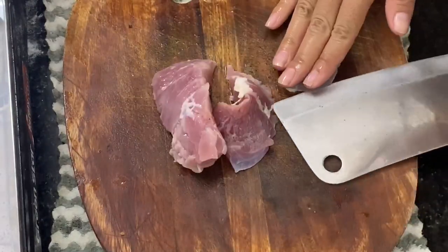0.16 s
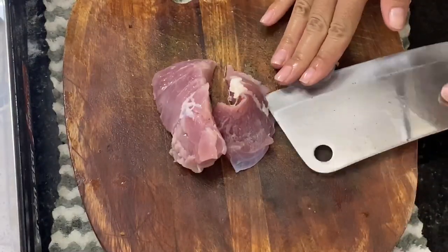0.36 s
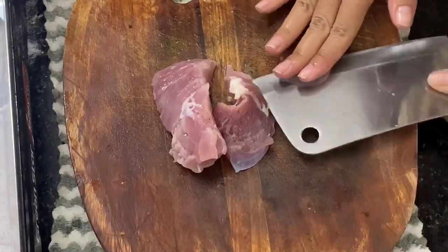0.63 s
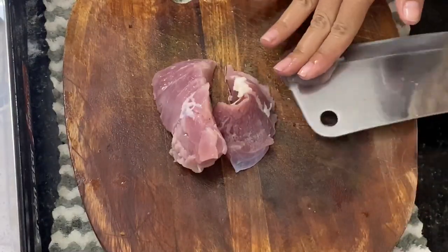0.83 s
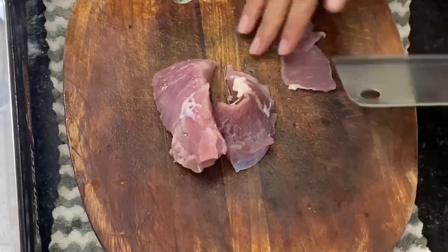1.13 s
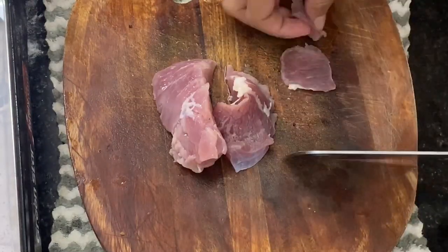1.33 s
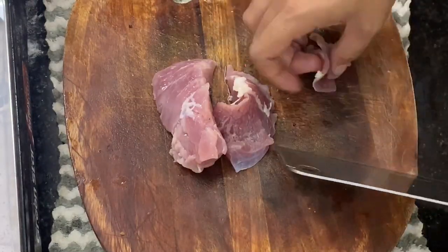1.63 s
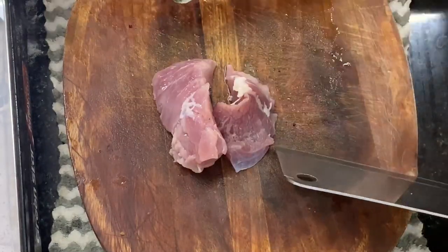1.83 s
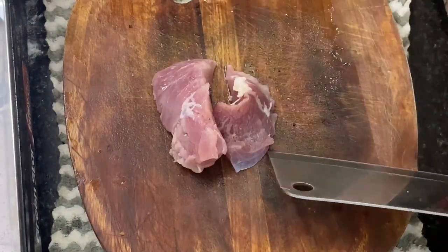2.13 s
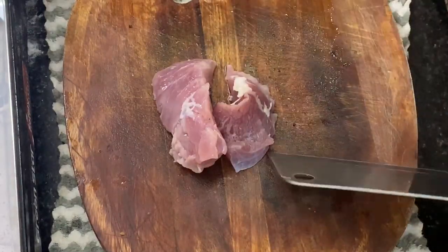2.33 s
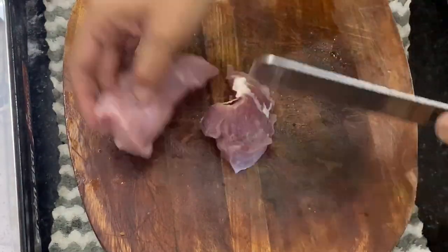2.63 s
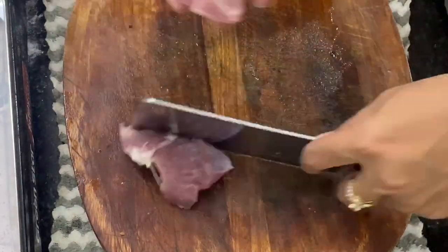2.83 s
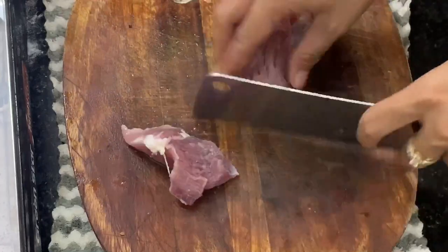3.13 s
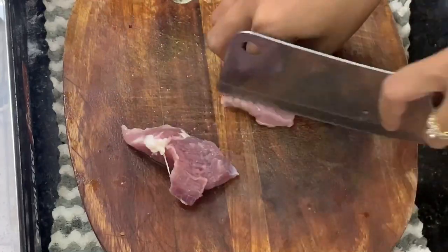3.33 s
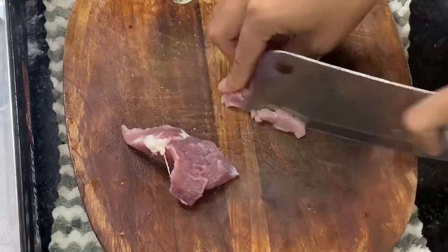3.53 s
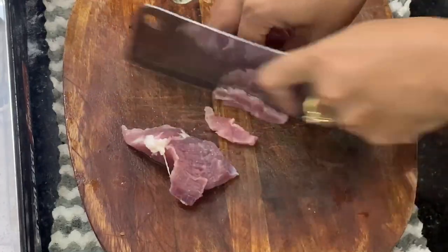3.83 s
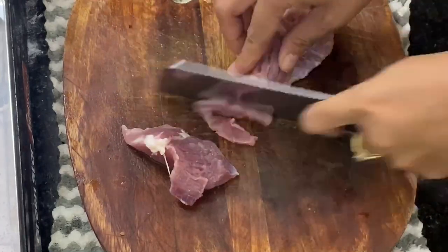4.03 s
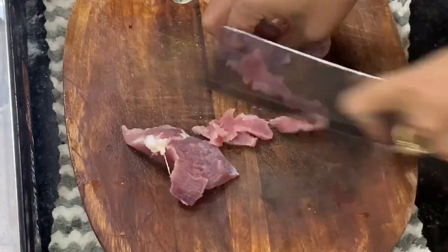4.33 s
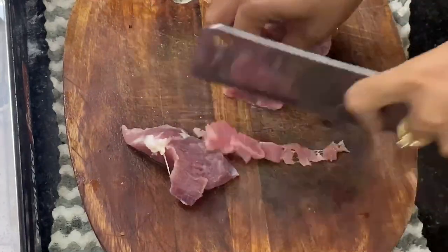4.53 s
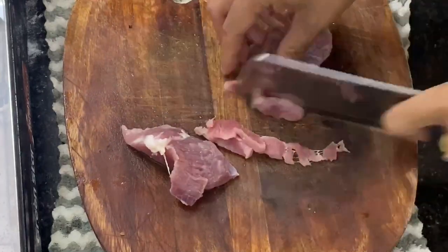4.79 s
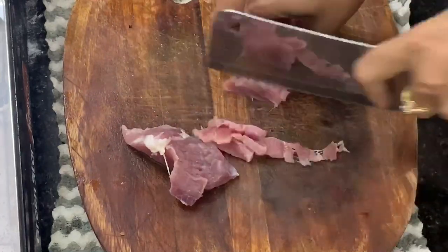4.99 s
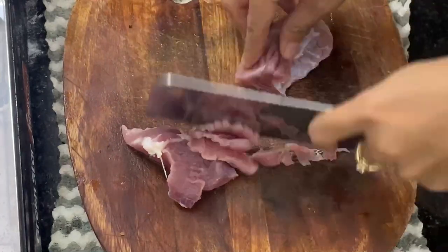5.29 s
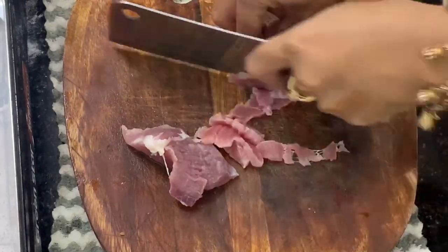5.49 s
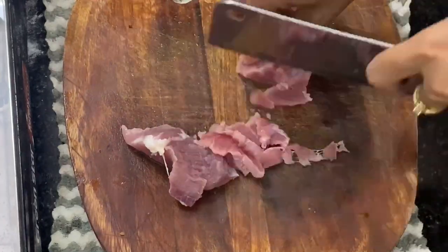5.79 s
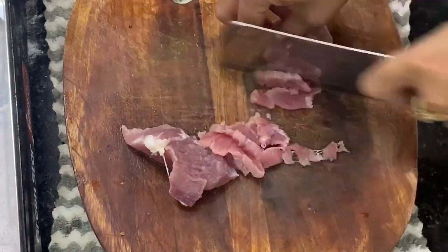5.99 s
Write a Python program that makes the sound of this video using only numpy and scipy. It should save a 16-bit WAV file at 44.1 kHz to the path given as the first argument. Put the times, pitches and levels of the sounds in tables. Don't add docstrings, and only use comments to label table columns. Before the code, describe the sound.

Raw meat is handled and cut on a wooden slab. The blade drags and ticks lightly, then rattles on the wood before a sharp, dry clack. After a lull come faint rustles, wet snaps, a heavy low thud and another hard clack with a scrape, then thinning ticks. Two close, spaced microphones catch a short tiled echo and steady low hum.

```python
import sys
import numpy as np
from scipy import signal
from scipy.fft import rfft, irfft, next_fast_len
from scipy.io import wavfile
from scipy.ndimage import uniform_filter1d, map_coordinates

SR = 44100
rng = np.random.default_rng(int(sys.argv[2]) if len(sys.argv) > 2 else 0)


def master_out(mix):
    frames = np.transpose(np.atleast_2d(mix))
    ceiling = np.clip(frames, -1, 1)
    pcm = np.round(ceiling * 32767).astype(np.int16)
    wavfile.write(sys.argv[1], SR, pcm)


def elevation(decibels):
    levels = np.asarray(decibels, float)
    return 10 ** (levels / 20)


N = 271215

# (pitch [Hz], left level [dB], right level [dB], time to fall 60 dB [s])
BOARD = [(688, -15.5, -6.5, 0.07), (863.4, -2.5, -25.5, 0.08), (878, 10.5, -6, 0.023),
         (905, 0, -15.5, 0.068), (931, -7.5, -0.5, 0.043), (1066, -16, -5, 0.074), (844, -22, -30.5, 0.47),
         (894, -23, -25.5, 0.7)]
# (pitch [Hz], left level [dB], right level [dB], time to fall 60 dB [s])
BOARD_LOW = [(375.6, -12, -5, 0.084), (407.5, -12, 6.5, 0.032)]
# (pitch [Hz], left level [dB], right level [dB], time to fall 60 dB [s])
BOARD_HIGH = [(1740, 0, -11, 0.018), (2340, -20, -13, 0.018), (3150, -9.5, -5, 0.0092)]
# (frequency [Hz], level [dB per Hz])
FIZZ = [(7500, -1), (8800, -2.5), (10500, 2), (13500, -0.5), (14500, -20), (15800, -4)]


def unit(x):
    return x / np.sqrt(np.mean(x ** 2) + 1e-20)


def along(points, hz):
    f, v = np.transpose(points)
    return np.interp(np.log(hz + 1), np.log(f + 1), v)


def wobble(rate):
    knots = rng.standard_normal(int(N * rate / SR) + 4)
    return map_coordinates(knots, [np.arange(N) * rate / SR])


def filtered(x, response):
    m = next_fast_len(N + 8192)
    return irfft(rfft(x, m) * response(np.fft.rfftfreq(m, 1 / SR)), m)[..., :N]


def paired(pair, gain):
    # (frequency [Hz], likeness [0-1])
    alike = [(60, 0.93), (150, 0.95), (350, 0.067), (900, 0.16), (8000, 0.033)]
    turn = lambda hz: np.arccos(np.clip(along(alike, hz), -1, 1)) / 2
    mid, side = filtered(pair, lambda hz: gain(hz) * [np.cos(turn(hz)), np.sin(turn(hz))])
    return np.array([mid + side, mid - side])


def rush(spectrum, grain_db=0, patchy_db=0):
    grainy = rng.standard_normal((2, N)) * elevation(grain_db * wobble(700))
    z = signal.stft(grainy, nperseg=256)[2]
    patches = uniform_filter1d(rng.standard_normal(z.shape[1:]), size=3, axis=0)
    patches = uniform_filter1d(patches, size=8, axis=1)
    pair = signal.istft(z * elevation(patchy_db * unit(patches)), nperseg=256)[1][:, :N]
    left, right = paired(pair, lambda hz: elevation(along(spectrum, hz)))
    return unit(np.array([left, np.roll(right, 20)]))


def ring(hz, db, t60, rise, blur_hz=0):
    t = np.arange(SR * 2 // 3) / SR
    wander = uniform_filter1d(rng.standard_normal(len(t)), size=24)
    drift = np.cumsum(wander) * np.sqrt(2 * np.pi * abs(blur_hz) / SR)
    fade = elevation(db - 60 * t / max(t60, .004))
    return fade * np.sin(2 * np.pi * hz * t + drift) * (1 - np.exp(-(t / rise) ** 2))


def slab(modes, db, rise=.0016):
    total = 0
    for hz, left_db, right_db, t60 in modes:
        note = ring(hz * rng.normal(1, .004), db + rng.normal(0, 1), t60, rise, blur_hz=10)
        total = total + note * elevation([[left_db], [right_db]])
    return total


def add(track, s, sound):
    track[..., max(round(s * SR), 0):][..., :sound.shape[-1]] += sound


def kitchen_air():
    # (frequency [Hz], level [dB per Hz])
    air_colour = [(150, -26), (290, -23), (560, -28.5), (1340, -28.5), (2390, -34), (8000, -56.5),
                  (10400, -85.5), (17600, -120)]
    # (frequency [Hz], level [dB per Hz])
    motor_colour = [(32, -42.5), (45, -0.5), (57, 2), (78, -0.5), (107, -2), (135, -7.5), (190, -12),
                    (260, -51)]
    air_db, hum_db, hum_drift_db = -59.5, -56.5, 2
    wash = elevation(air_db - 1.5) * rush(air_colour)
    hum = elevation(hum_db + 1.74 * wobble(13.0) + hum_drift_db * wobble(2.23))
    return wash + hum * rush(motor_colour)


def stroke(s, length, db):
    u = np.clip((np.arange(N) / SR - s) / length, 0, 3)
    return elevation(db) ** 2 * (1 - np.exp(-u * 9)) ** 2 * np.exp(-u ** 4)


def strokes():
    # (time [s], level [dB])
    busy_hands = [(0, -60.5), (.3, -67), (.55, -66.5), (.95, -73), (1.6, -70), (1.9, -73.5), (2.2, -69),
                  (2.7, -71), (3.05, -73.5), (3.25, -89.5), (3.42, -66), (3.8, -77.5), (4.4, -69),
                  (4.75, -72.5), (5.1, -70.5), (5.53, -81), (5.75, -73.5), (6.15, -70)]
    # (time [s], length [s], level [dB])
    drags = [(0, 0.075, -54), (0.06, 0.035, -41.5), (0.611, 0.027, -48.5), (0.699, 0.05, -48.5),
             (0.778, 0.041, -46.5), (0.885, 0.018, -46.5), (0.943, 0.036, -60), (1.834, 0.08, -44),
             (2.003, 0.19, -56.5), (2.475, 0.11, -56), (2.57, 0.034, -49.5), (3.956, 0.052, -57.5),
             (4.014, 0.065, -45.5), (4.14, 0.11, -51), (4.323, 0.066, -55.5), (4.783, 0.088, -39),
             (4.98, 0.16, -57), (5.82, 0.032, -58)]
    # (time [s], length [s], level [dB], wetness [dB])
    slides = [(0, 0.14, -69.5, 7.5), (0.061, 0.051, -49.5, -6), (0.118, 0.076, -83, 8),
              (0.541, 0.086, -57, -21), (0.608, 0.029, -53.5, -9.5), (0.694, 0.13, -55.5, 0),
              (0.76, 0.045, -57, 3.5), (0.899, 0.014, -59, -28), (0.99, 0.18, -62, -11),
              (1.193, 0.057, -88, 6), (1.83, 0.04, -62.5, -27.5), (2.03, 0.18, -64.5, -16),
              (2.47, 0.16, -68, -26.5), (2.56, 0.069, -63.5, -13.5), (2.933, 0.077, -83, 11),
              (3.529, 0.077, -65, -3.5), (3.921, 0.092, -93, 29.5), (4.014, 0.052, -50, -7.5),
              (4.054, 0.038, -60.5, 2), (4.157, 0.099, -57.5, 5), (4.183, 0.075, -55, -9),
              (4.328, 0.061, -62, 1.5), (4.78, 0.086, -47, -19), (4.9, 0.23, -65, -34),
              (5.123, 0.1, -58.5, -29), (5.82, 0.054, -57.5, -24)]
    rest_drag_db, rest_fizz_db = -65.5, -87
    drag_follows, fizz_follows = 0.069, 0.7
    times, levels = np.transpose(busy_hands)
    busy_db = np.interp(np.arange(N) / SR, times, levels)
    swing_db = busy_db - busy_db.mean()
    drag = elevation(rest_drag_db + drag_follows * swing_db) ** 2
    meat = elevation(busy_db) ** 2
    fizz = elevation(rest_fizz_db + fizz_follows * swing_db) ** 2
    for s, length, db in drags:
        drag = drag + stroke(s, length, db)
    for s, length, db, wet_db in slides:
        meat = meat + stroke(s, length, db)
        fizz = fizz + stroke(s, length, db + wet_db)
    return np.sqrt([drag, meat, fizz])


def handling():
    # (frequency [Hz], level [dB per Hz])
    drag_colour = [(250, -39), (500, -1.5), (750, 4), (900, -8), (1100, 6.5), (1300, -18.5), (1500, -3),
                   (2200, -17.5), (3200, -59)]
    # (frequency [Hz], level [dB per Hz])
    meat_colour = [(1200, 3), (2200, 1), (3800, 3), (5500, -5), (8000, -9), (10000, -27)]
    drag, meat, fizz = strokes()
    jerk = wobble(60)
    grit = rng.standard_normal(N) * elevation(4.9 * wobble(300))
    slab_notes = slab(BOARD, 0) + slab(BOARD_LOW, -8.5) + slab(BOARD_HIGH, -12)
    rubbed = unit(signal.fftconvolve(grit[None], slab_notes, axes=1)[:, :N])
    scrape = 0.52 * rubbed + 0.67 * rush(drag_colour, grain_db=1.0, patchy_db=2.5)
    wood = drag * elevation(1.16 * jerk) * scrape
    flesh = meat * elevation(1.6 * jerk) * rush(meat_colour, grain_db=5.5, patchy_db=4.5)
    film = fizz * elevation(4.0 + 1.6 * jerk + 0.5 * wobble(27)) * rush(FIZZ, grain_db=0.0, patchy_db=5.5)
    return wood + flesh + film


def counter():
    # (time [s], peak [dB], deep note [dB], time to fall 60 dB [s], first push [dB])
    thuds = [
        (0.059, -45.5, -3, 0.23, 10),
        (0.612, -49, -23, 0.26, 8),
        (1.8475, -27.5, -47, 0.35, 28.5),
        (2.352, -39, -35, 0.1, 3.5),
        (3.581, -46, -18, 0.11, 12.5),
        (4.0229, -33.5, -5.5, 0.28, 10),
        (4.737, -42.5, -16, 0.55, 14),
        (4.996, -48, -25, 0.22, 9),
    ]
    # (pitch [Hz], level [dB], share of the thud's fall time [ratio])
    counter_notes = [(109.7, -2.5, 1.72), (162.2, -12.5, 1.62), (234, -2.5, 0.23), (330, -11, 0.31),
                     (620, -7.5, 0.2)]
    # (frequency [Hz], level [dB per Hz])
    slap_colour = [(50, -29.5), (110, -8.5), (250, 2.5), (500, -2.5), (1000, -18.5), (2000, -24.5),
                   (3800, -32), (6000, -67)]
    out, shake = np.zeros(N + SR), np.zeros(N + SR)
    t = np.arange(SR // 2) / SR
    for s, db, deep_db, t60, push_db in thuds:
        for hz, level, share in counter_notes:
            add(out, s, ring(hz, db + level + rng.normal(0, 1.2), t60 * share, rise=.004, blur_hz=6))
        add(out, s, ring(54.0, db + deep_db, 0.97, rise=0.026))
        add(out, s, ring(216, db + push_db, 0.016, rise=0.0055))
        add(shake, s, elevation(db - 10 - 60 * t / (t60 * 1.62)) * (1 - np.exp(-t / 0.0008)))
    return out[:N] + shake[:N] * rush(slap_colour, grain_db=-2.0, patchy_db=1.5)


def board():
    # (time [s], peak [dB], low notes [dB], hardness [dB])
    knocks = [(0.065, -43, -19, -17), (0.082, -38, -20, -16), (0.617, -47.5, 5.5, -12),
              (0.9, -36, -8.5, -16), (1.847, -36.5, 5, -7), (2.026, -31.5, -4, -37),
              (2.051, -38, -2.5, -25), (2.076, -35.5, -28, -28), (2.104, -33, -9.5, -27),
              (2.132, -33, -10, -13), (2.344, -43, -22, -10.5), (2.357, -7.5, -15, -18),
              (2.401, -26, -24, -25), (2.416, -32, -24.5, -24), (2.497, -35.5, -24, -23),
              (2.609, -50, 0, 3), (2.909, -45, -18, -31), (4.025, -32, -1.5, -7),
              (4.742, -7.5, -16.5, -17.5), (4.781, -30, -7, -8), (4.787, -23, -26, -26),
              (4.849, -25.5, -13.5, -8), (4.999, -46.5, 10.5, -12.5), (5.836, -46, -1, -16)]
    # (pitch [Hz], left [dB], right [dB], time to fall 60 dB [s])
    late_note = [(1493, -6, -10.5, 0.11)]
    damp_per_db, damp_min = 3.5, 0.76
    out, t = np.zeros((2, N + SR)), np.arange(SR * 2 // 3) / SR
    for s, db, low_db, hard_db in knocks:
        ringing = np.clip(1.5 + damp_per_db * (db + 9), damp_min, 1)
        rest = elevation(-60 * t / 0.088 * (1 / ringing - 1))
        knock = slab(BOARD, db - 7.0) + slab(BOARD_LOW, db + low_db + 0.5)
        knock = knock + slab(BOARD_HIGH, db + hard_db + 4)
        knock = knock + slab(late_note, db + hard_db + 6.5, rise=0.0057)
        add(out, s - .0015, rest * knock)
    return out[:, :N]


def blade():
    # (time [s], peak [dB], time to fall 60 dB [s])
    chatter = [
        (2.0242, -60.5, 0.03),
        (2.0506, -56.5, 0.044),
        (2.075, -54.5, 0.072),
        (2.105, -62, 0.043),
        (2.1306, -55.5, 0.043),
        (2.581, -61, 0.13),
        (2.608, -63.5, 0.046),
        (2.8993, -71, 0.054),
        (4.7401, -59, 0.06),
        (4.8494, -51, 0.036),
    ]
    # (pitch [Hz], level [dB])
    blade_notes = [(2360, 7), (5800, 4), (6760, 9.5), (7150, 4), (8900, 5.5), (10650, 9.5), (12300, 12.5),
                   (13100, -3), (13730, -7)]
    # (time [s], pitch [Hz], level [dB], time to fall 60 dB [s], blur [Hz])
    sings = [(.075, 1490, -57, .2, 15), (.36, 10650, -66, .2, 30), (.402, 5500, -60, .16, 35),
             (.72, 3100, -60, .3, 150), (1.39, 5520, -63, .18, 20), (1.62, 13200, -80, .15, 20),
             (1.91, 7150, -85, .8, 20), (2.03, 6760, -64, .3, 15), (1.3, 5800, -84, 2.5, 30),
             (1.45, 7150, -85, 2.5, 30), (1.8, 5200, -85, 2.5, 30), (2.4, 5800, -84, 2.5, 30),
             (2.4, 7150, -87, 2.5, 30), (2.4, 5200, -87, 2.5, 30), (2.61, 5800, -68, .12, 15),
             (2.942, 13730, -56, .33, 60), (4.03, 3280, -60, .25, 150), (4.168, 3280, -57, .4, 200),
             (4.19, 1700, -58, .2, 150), (4.82, 12900, -62, .12, 60), (4.83, 3800, -63, 1.1, 200),
             (4.99, 4600, -65, .6, 200), (5.135, 3850, -57, .3, 200), (5.425, 3900, -60, .2, 200),
             (5.25, 6760, -76, .45, 45)]
    rise_share, rise_max_s = 0.031, 0.034
    out = np.zeros((2, N + SR))
    for s, db, t60 in chatter:
        for hz, level in blade_notes:
            note = ring(hz, db + level - 11.0 + rng.normal(0, 0.44), t60, rise=0.0008, blur_hz=69.4)
            add(out, s, note * rng.choice([-1, 1], (2, 1)))
    for s, hz, db, t60, blur_hz in sings:
        line = ring(hz, db + 5.5, t60, min(rise_share * t60, rise_max_s), blur_hz)
        add(out, s, line * [[1], [.7]])
    return out[:, :N]


def ticks():
    # (time [s], peak [dB], ring pitch [Hz], brightness [dB])
    contacts = [(0.097, -48, 2320, -17), (0.109, -48, 5200, -19), (0.215, -60, 4500, -25),
                (0.267, -61, 2110, -22), (0.2988, -54.5, 3660, -18), (0.358, -53, 5800, -7),
                (0.4005, -43.5, 5480, -11), (0.574, -38.5, 3800, -42), (0.623, -53, 3740, -19),
                (0.8968, -53, 2380, -7.5), (1.0147, -55, 4080, -10), (1.06, -54.5, 4060, -30.5),
                (1.1823, -53.5, 3840, -24.5), (1.386, -42, 5460, -21.5), (1.4168, -42, 2350, -12),
                (1.612, -64, 2400, -8), (2.357, -51, 3120, -16), (3.2297, -63.5, 10400, -14.5),
                (3.417, -51.5, 4070, -35), (3.585, -43.5, 3974, -35), (4.0303, -44, 3290, -2),
                (4.249, -54, 4200, -20), (4.492, -40, 3900, -23.5), (4.627, -52, 3870, -23),
                (4.7399, -39, 2906, -23.5), (4.793, -35.5, 4000, -29.5), (5.1311, -33, 3946, -62),
                (5.2, -53.5, 3700, -38), (5.224, -49, 3810, -47), (5.4212, -42, 3930, -29),
                (5.8235, -44, 13100, -10.5)]
    # (pitch [Hz], level [dB])
    steel_notes = [(2800, -15.5), (3650, -8), (3920, -19.5), (4800, -23), (5500, -16.5), (7980, -18),
                   (9320, -31)]
    # (frequency [Hz], level [dB per Hz])
    crack_colour = [(1200, -37.5), (2200, -8.5), (3700, -3), (4600, -4.5), (6200, -8), (8000, -1),
                    (9600, -14.5), (11000, -44)]
    crack, bright, rings = np.zeros((3, 2, N + SR))
    t = np.arange(2048) / SR
    fade = elevation(-60 * t / 0.023) * (1 - np.exp(-t / 0.00024))
    for s, db, hz, bright_db in contacts:
        if hz < 9000:
            for f, level in steel_notes:
                note = ring(f, db + level + 1.5 + rng.normal(0, 4), .02, rise=.0005, blur_hz=80)
                add(rings, s, note * np.array([[1], [-.7]]))
        own_ring = ring(hz, db - 0.5, 0.043, rise=0.0011, blur_hz=330)
        add(rings, s, own_ring * [[1], [.7]])
        add(crack, s, elevation(db + 5.5) * fade * rng.standard_normal((2, 2048)))
        add(bright, s, elevation(db + bright_db + 8.0) * fade * rng.standard_normal(2048))
    colour = lambda x, points: filtered(x[:, :N], lambda f: elevation(along(points, f)))
    return rings[:, :N] + colour(crack, crack_colour) + colour(bright, FIZZ)


def snaps():
    # (time [s], peak [dB], pitch [Hz])
    tears = [(0.3022, -63, 13600), (0.359, -49, 10650), (0.5013, -63, 10000), (0.7143, -46, 11000),
             (1.1947, -63, 15500), (1.2451, -68, 13000), (3.4356, -67, 10200), (3.5448, -56, 10700),
             (3.7219, -59, 13200), (3.8122, -69, 13700), (3.8616, -64, 10500), (3.901, -63, 10500),
             (3.931, -39.5, 12700), (4.0013, -44, 9950), (4.1634, -58, 10500), (4.3316, -56, 10200),
             (4.79, -48, 9560), (4.8204, -53, 12800), (4.8264, -53, 12800), (4.8484, -53, 10800),
             (4.8663, -50, 12700), (5.0245, -53, 13300)]
    out = np.zeros((2, N + SR))
    for s, db, hz in tears:
        add(out, s - .001, ring(hz, db, 0.016, rise=0.0013, blur_hz=900))
    return out[:, :N]


def wall(x):
    delay_s, level_db, dull_hz = .0145, -9.5, 5030
    echo = lambda hz: np.exp(-2j * np.pi * hz * delay_s) / (1 + (hz / dull_hz) ** 6)
    return elevation(level_db) * filtered(x[::-1], echo)


def room(x):
    # (frequency [Hz], time to fall 60 dB [s])
    kitchen = [(100, 0.91), (900, 0.32), (4000, 0.57), (12000, 0.11)]
    hz, t, z = signal.stft(rng.standard_normal((2, SR * 2 // 3)), SR, nperseg=256)
    tail = signal.istft(z * elevation(-60 * t / along(kitchen, hz)[:, None]), SR, nperseg=256)[1]
    late = np.pad(x.mean(0), (200, 0))[None]
    wet = signal.fftconvolve(late, tail / np.linalg.norm(tail[0]), axes=1)
    return paired(wet[:, :N], lambda hz: 1)


def scene():
    air, hands, boom, wood, steel, clicks = kitchen_air(), handling(), counter(), board(), blade(), ticks()
    to_room = elevation(-10.5) * wood + elevation(-14.5) * boom + elevation(-8) * clicks + elevation(-2.5) * steel + elevation(-4.0) * hands
    echo = wall(elevation(5.5) * clicks + elevation(-2.0) * wood)
    return wood + boom + clicks + echo + snaps() + steel + hands + room(to_room) + air


def band_limit(x):
    return signal.sosfilt(signal.butter(12, 15840, fs=SR, output="sos"), x)


def record(dry):
    # (frequency [Hz], difference [dB])
    lean = [(60, -1.5), (350, 0), (900, 1.5), (4000, 3), (9000, 1)]
    shared_hz, top_hz, lag = 8150, 15800, 13
    own_share = .32
    above = lambda hz: np.clip((hz - shared_hz) / 400 + .5, 0, 1)
    low = filtered(dry, lambda hz: (1 - above(hz)) * elevation(along(lean, hz) * [[.5], [-.5]]))
    own, top = filtered(dry, lambda hz: above(hz) * (hz < top_hz))
    left = np.sqrt(1 - own_share ** 2) * np.roll(top, lag) + own_share * own
    return band_limit(low + [left, top])


dry = scene()
out = record(dry)
master_out(out)
```